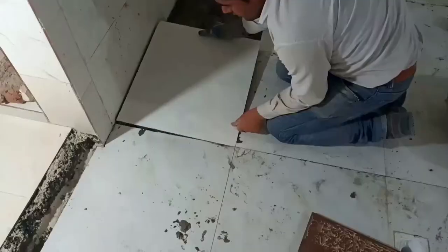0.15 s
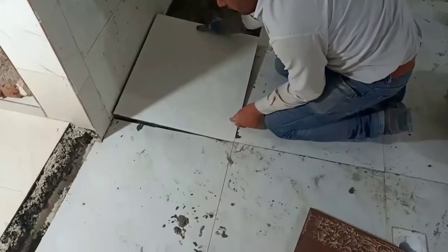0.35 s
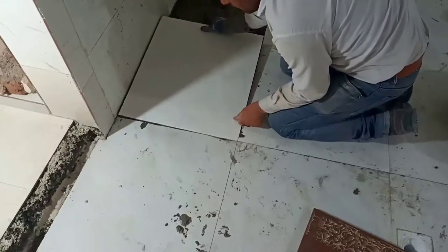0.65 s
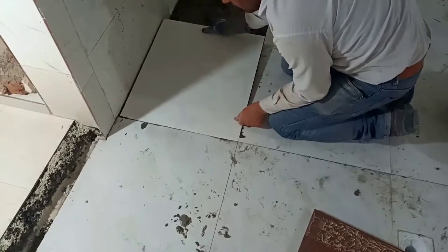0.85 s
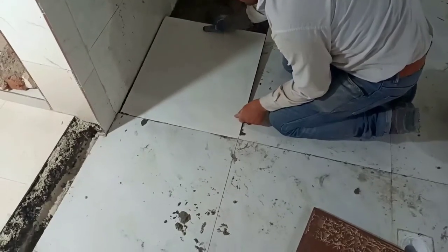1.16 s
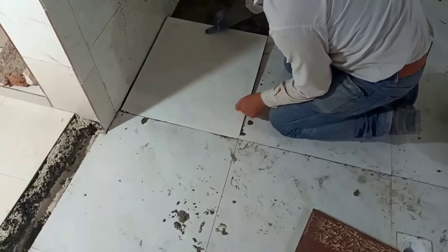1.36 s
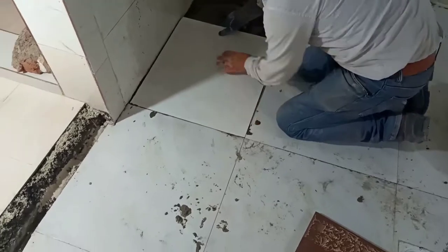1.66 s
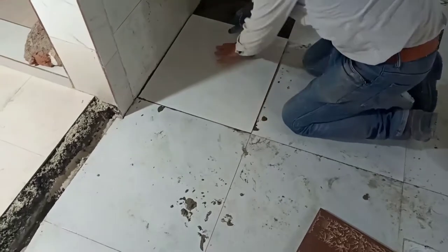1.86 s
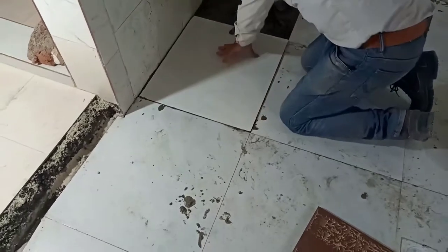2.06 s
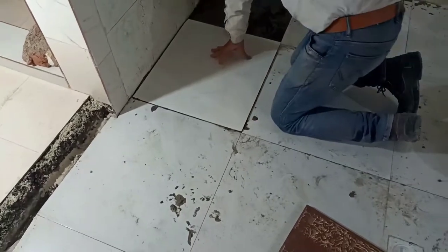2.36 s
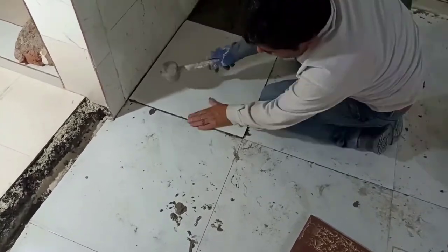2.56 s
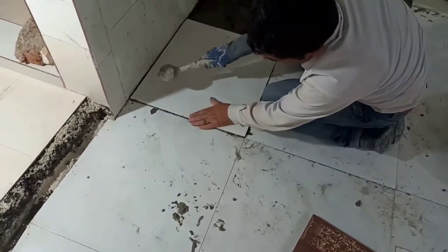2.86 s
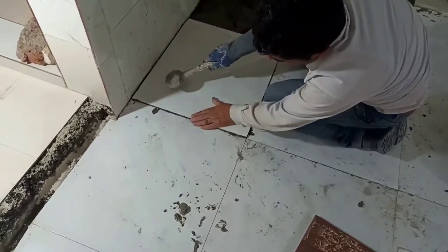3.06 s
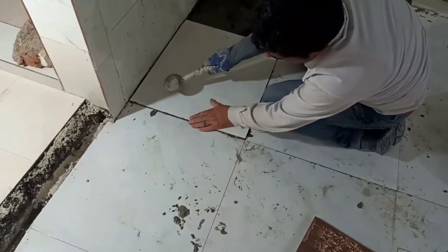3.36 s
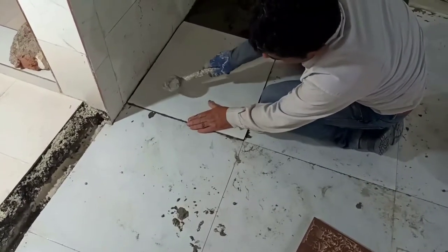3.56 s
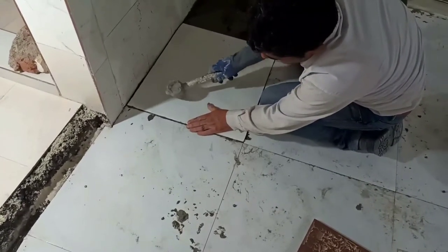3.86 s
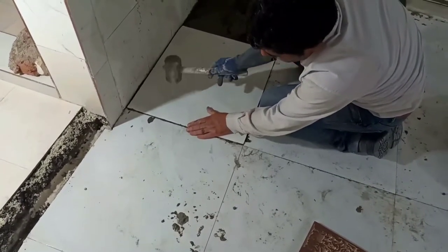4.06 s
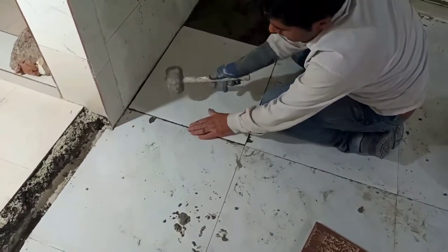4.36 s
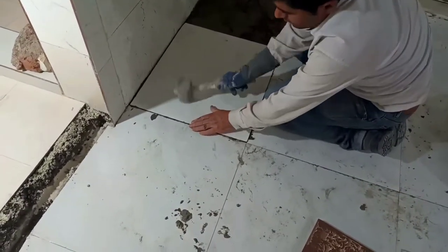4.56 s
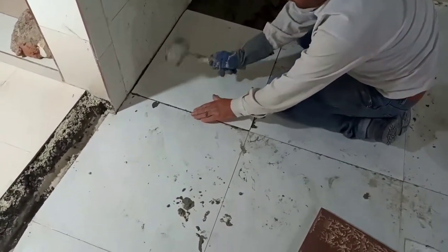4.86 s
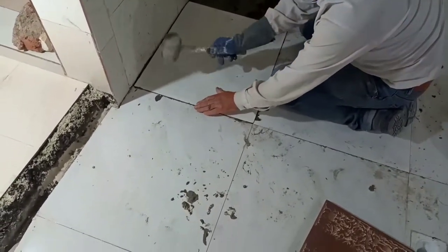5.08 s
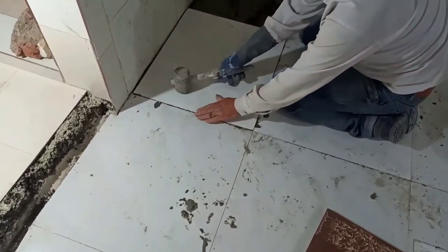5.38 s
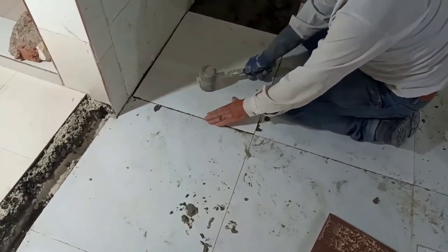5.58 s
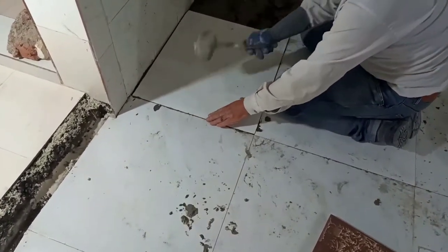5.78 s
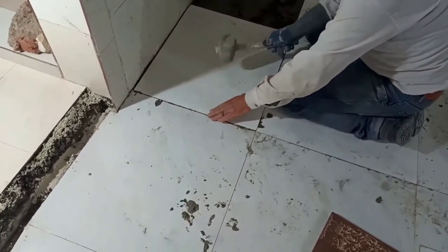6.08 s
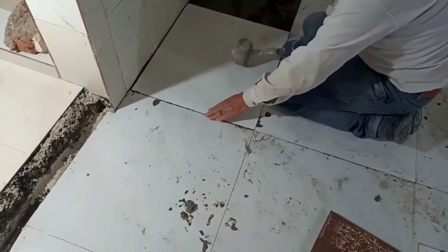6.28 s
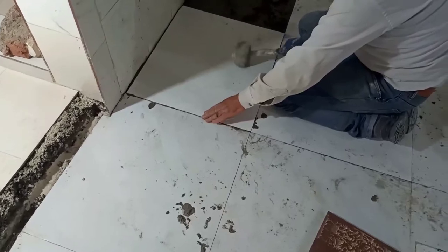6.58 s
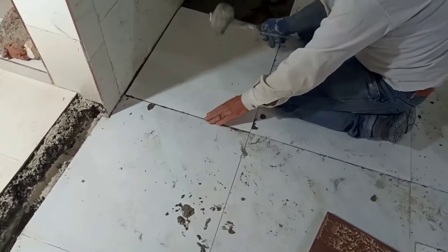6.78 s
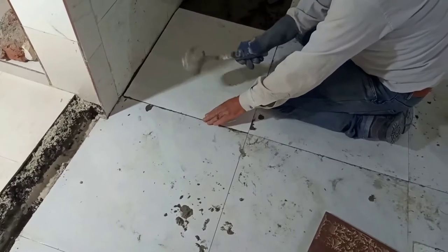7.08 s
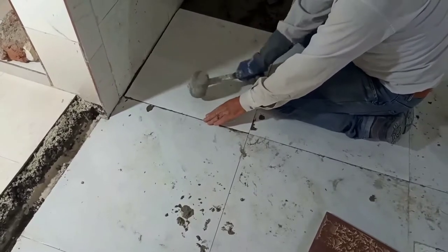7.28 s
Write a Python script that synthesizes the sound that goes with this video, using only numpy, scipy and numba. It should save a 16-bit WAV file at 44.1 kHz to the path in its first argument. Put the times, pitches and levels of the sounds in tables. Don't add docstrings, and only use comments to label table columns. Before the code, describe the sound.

In a bare, echoing bathroom, a fizzy wet squeegee stroke with tiny water ticks ends abruptly. A big ceramic tile then scrapes over grit, rocks and knocks its neighbours. After a short lull, a rubber mallet strikes about three times a second, hollow and cracking at first, then firmer and louder. A faint cricket rasps outside. Close phone pickup squashes the blows and lifts the long reverberation.

```python
import sys
import numpy as np
from scipy import signal
from scipy.fft import rfft, irfft
from scipy.io import wavfile
from scipy.ndimage import uniform_filter1d
from numba import njit

SR = 44100
rng = np.random.default_rng(int(sys.argv[2]) if len(sys.argv) > 2 else 0)


def gain_from_decibels(decibels):
    exponent = np.asarray(decibels, float) / 20
    return 10 ** exponent


def wrap_up_sound(samples):
    columns = np.atleast_2d(samples).T
    tamed = np.clip(columns, -1, 1)
    steps = np.round(tamed * 32767).astype(np.int16)
    wavfile.write(sys.argv[1], SR, steps)


N = 327663
T = np.arange(N) / SR
HZ = np.maximum(np.arange(N // 2 + 1) * SR / N, 1)

CUT_TIMES = (.1595, .162, .2015, .203, .213, .217)
BAND_EDGES = KEP_EDGES = (550, 2400, 8620)
# (time [s], peak [dB], tile note [Hz], slap [dB], crack [dB])
HOLLOW_BLOWS = [
    (2.8544, -17.5, 172, -39, -37),
    (3.1634, -15, 170, -43.5, -32),
    (3.4574, -15, 165, -44, -34),
    (3.7368, -15, 169, -46, -42),
    (4.0238, -12.5, 166, -46, -56),
]
# (time [s], peak [dB], tile note [Hz], slap [dB], crack [dB])
FIRM_BLOWS = [
    (4.355, -11, 174, -41, -48),
    (4.7158, -10.5, 206, -45.5, -54),
    (5.0499, -10.5, 212, -45, -42),
    (5.3479, -10, 232, -48, -36),
    (5.6296, -22, 230, -54.5, -66),
    (6.0974, -13.5, 188, -35.5, -32),
    (6.4056, -12, 213, -28, -30),
    (6.6835, -13, 195, -35, -40),
    (7.0913, -12.5, 198, -40, -34.5),
    (7.403, -12.5, 210, -26, -28.5),
]


def unit(x):
    return x / np.sqrt(np.mean(x ** 2))


def curves(table):
    s, *columns = np.transpose(table)
    return [np.interp(T, s, c) for c in columns]


def step(hz, sharp):
    return 1 / (1 + np.exp(np.clip(-sharp * np.log(HZ / hz), -50, 50)))


def shape(x, gain):
    return irfft(rfft(x) * gain, N)


def colour(points):
    hz, db = np.transpose(points)
    return gain_from_decibels(np.interp(np.log(HZ), np.log(hz), db))


def split(x, edges, sharp):
    above = [1] + [step(e, sharp) for e in edges] + [0]
    return [unit(shape(x, np.sqrt(np.maximum(a - b, 0)))) for a, b in zip(above, above[1:])]


@njit
def svf(x, hz, width):
    y, b, l = np.empty(len(x)), 0., 0.
    for i in range(len(x)):
        g, k = np.tan(np.pi * hz[i] / SR), width / hz[i]
        v = (b + g * (x[i] - l)) / (1 + g * (g + k))
        b, l, y[i] = 2 * v - b, l + 2 * g * v, k * v
    return y


def noise_band(noise, hz, first_width, second_width):
    centre = np.full(len(noise), float(hz))
    return svf(svf(noise, centre, first_width), centre, second_width)


def grit(spread_db, smear_s):
    power = gain_from_decibels(spread_db * np.minimum(rng.exponential(size=N), 7)) ** 2
    keep = np.exp(-1 / (smear_s * SR))
    swell = np.sqrt(signal.lfilter([1 - keep], [1, -keep], power))
    return unit(swell * rng.standard_normal(N))


def add(out, s, x):
    i = int(s * SR)
    out[i:i + len(x)] += x[:N - i]


def fade(t, t60):
    return np.exp(-np.log(1000) * t / t60)


def tails(starts, levels, falls, sudden, share, start_db, start_s, blend_s):
    k = np.maximum(np.searchsorted(starts, T, "right") - 1, 0)
    age = np.maximum(T - np.array(starts)[k], 0)
    db = np.array(levels).T[:, k] - np.outer(share, falls[k] * age)
    db = db + np.outer(start_db, sudden[k] * np.exp(-age / start_s))
    return uniform_filter1d(db, int(blend_s * SR), axis=1)


def played(source, colours, rings, changes, levels, ripple_db):
    out = 0
    for points, peaks, a, b in zip(colours, rings, (0,) + changes, changes + (N / SR,)):
        ring = 1 + sum(gain_from_decibels(db) / (1 + 2j * (HZ - hz) / w) for hz, w, db in peaks)
        comb = np.clip(rng.standard_normal(800), -3, 1.6)
        ripple = gain_from_decibels(ripple_db * np.interp(HZ / 30, np.arange(800), comb))
        bands = split(shape(source, colour(points) * ring * ripple), BAND_EDGES, 3.39)
        stage = np.interp(T, (a - .003, a + .003, b - .003, b + .003), (0, 1, 1, 0))
        out = out + sum(x * gain_from_decibels(db) for x, db in zip(bands, levels)) * stage
    return out


def room_floor():
    # (frequency [Hz], level [dB per Hz])
    floor_colour = [(12, -42.5), (20, -8), (202, 9), (238, 14), (382, -3), (2400, -13.5), (4430, -38),
                    (5530, -56), (6720, -44), (15500, -51)]
    return gain_from_decibels(-57) * unit(shape(rng.standard_normal(N), colour(floor_colour)))


def cricket():
    # (first chirp [s], last [s])
    phrases = [
        (2.67, 3.8),
        (5.0, 7.43),
    ]
    # (time [s], level [dB])
    lift = [(2.7, -90), (2.95, -81), (3.3, -84), (3.6, -82), (5.2, -86), (5.45, -79), (5.7, -79),
            (5.85, -83), (6.0, -91), (6.15, -77), (6.55, -74), (6.75, -81), (6.95, -80), (7.2, -77)]
    # (frequency [Hz], level [dB per Hz])
    rasp_colour = [(9700, -38), (10100, 0), (11500, 2), (11700, -2), (12300, -6), (12700, -40)]
    chirp_s, sounding = .125, .78
    chirps = 0
    for a, b in phrases:
        phase = (T - a) / chirp_s % 1
        swell = 0.28 + 0.55 * phase / sounding
        chirps = chirps + swell * (phase < sounding) * (T > a - .03) * (T < b)
    rasp = unit(shape(rng.standard_normal(N), colour(rasp_colour)))
    chirps = uniform_filter1d(np.roll(chirps, SR // 50), SR // 100)
    return chirps * gain_from_decibels(curves(lift)[0]) * rasp


def standing_waves(age, far):
    # (frequency [Hz], level [dB])
    far_push = [(131.8, -44.1), (135.0, -48.2), (189.8, -39.9), (204.8, -44.2), (281.8, -47.8)]
    far_pull = [(152, -45), (157.2, -39), (161.5, -46), (167.2, -46.5), (174, -43.5), (211.2, -46),
                (236.8, -41.5), (244.5, -46), (261.5, -49.5)]
    near_push = [(152.8, -43.5), (157.2, -41), (185, -46), (193.8, -42), (198.5, -42), (211.2, -45),
                 (283.2, -44.5), (426.2, -45)]
    near_pull = [(189.8, -40.5), (217.5, -44.5), (227.2, -39), (246.2, -44.5), (344, -42.5), (398.2, -45.5)]

    def waves(modes, t):
        return sum(gain_from_decibels(db) * np.sin(2 * np.pi * hz * t) for hz, db in modes)

    t = T[:SR]
    late = t - .003
    from_near = unit(waves(near_push, t) - waves(near_pull, t))
    from_far = unit(waves(far_push, late) - waves(far_pull, late))
    i = np.minimum((age * SR).astype(int), SR - 1)
    return np.where(far, from_far[i], from_near[i]) * np.clip((age - .014) / .008, 0, 1)


def echo():
    # (boom [dB], body [dB], hiss [dB], air [dB], fall [dB/s])
    let_through = [(-34.5, -50.5, -48, -55, 28.5), (-32, -37.5, -53, -56, 35.5),
                   (-32, -40.5, -51.5, -57, 36), (-31.5, -38, -52.5, -59, 37.5),
                   (-35, -51, -64.5, -94, 30.5), (-28.5, -56.5, -53.5, -102, 36.5),
                   (-34.5, -47, -68.5, -102, 3), (-31.5, -49, -62.5, -79, 1.5), (-32.5, -44, -59, -67, -7),
                   (-28, -36.5, -74, -61, 35.5), (-30.5, -53, -55.5, -58.5, -1),
                   (-30.5, -42.5, -53.5, -57.5, -9), (-30, -50.5, -56, -68, 0),
                   (-34, -46.5, -68, -59.5, -14.5), (-31, -50, -74, -49, 10)]
    # (frequency [Hz], level [dB per Hz])
    echo_colours = [
        [(18, -79), (30, -45), (85, 4), (164, -2), (243, -1), (420, -21), (728, -24), (1820, -27), (3070, -34),
         (7460, -40), (15500, -79)],
        [(30, -55), (95, 3), (164, 2), (243, -5), (399, -20), (921, -25.5), (1200, -28), (4090, -35.5),
         (5040, -41.5), (6540, -41.5), (15500, -70.5)],
        [(18, -79), (30, -58), (110, -1.5), (225, -4), (410, -15.5), (600, -21), (800, -26.5), (1800, -35.5),
         (2500, -43.5), (6500, -54), (15500, -82)],
        [(18, -70), (30, -48), (69, -21.5), (144, -2.5), (225, -5), (467, -6.5), (561, -13.5), (874, -19),
         (3780, -27.5), (5890, -32), (6540, -34), (9680, -45.5), (15500, -70)],
    ]
    # (frequency [Hz], width [Hz], level [dB])
    loose = [(740, 270, 7), (850, 250, 14), (1400, 100, 3), (2080, 100, 10), (3050, 180, 15),
             (3300, 120, 3), (4530, 200, -6)]
    settling = [(950, 27, -2), (1490, 28, 5.5), (1879, 170, -8)]
    room_modes = [(200, 5.5, -11), (237.5, 19, 4.5), (283, 31, 2.5), (346.7, 5.9, 3.5), (400, 10, -2),
                  (493, 9.5, -21)]
    bedded_modes = [(154, 21, -6.5), (195, 5.5, 1), (231, 14, 6.5), (276, 16, -0.5), (337, 10.5, -0.5),
                    (405, 11, -7), (483, 23, -4), (960, 60, -2.5), (4060, 430, -6), (6730, 100, -5)]
    bedding = (3.163, 4.355, 5.05, 6.097)
    standing_share = (.8, .85, .85, .8, .8, .3, .55, .5, .25, .05, .55, .5, .25, .55, .45)
    # share of the fall, and early reflections on top [dB]
    echo_fall = (0.89, 0.74, 1.02, 1.3)
    early_db = (-5, 19, -4, 12.5)
    gate_slope = (2.8, 2.8, 3.4, 4.5)
    gate_db, air_fall_db_s = -40, 44

    blows = HOLLOW_BLOWS + FIRM_BLOWS
    starts = np.array([b[0] for b in blows])
    live = np.interp(T, (starts[0], starts[0] + 0.0059), (0, 1))
    for s in starts:
        add(live, s, -.75 * live[int(s * SR)] * np.exp(-(T[:SR // 20] / 0.0077) ** 2))
    live = uniform_filter1d(uniform_filter1d(live, SR // 500), SR // 500)

    rows = np.array(let_through)
    sudden = np.interp([b[3] for b in blows], (-57.5, -42.5), (0, 1))
    levels = tails(starts, rows[:, :-1], rows[:, -1], sudden, echo_fall, early_db, 0.02, 0.0055)
    levels = levels - np.outer(gate_slope, np.maximum(gate_db - levels[0], 0))
    k = np.maximum(np.searchsorted(starts, T, "right") - 1, 0)
    age = np.maximum(T - starts[k], 0)
    levels[3] -= air_fall_db_s * age

    share = np.array(standing_share)[k]
    modes = np.sqrt(share) * gain_from_decibels(levels[0] + 1.1) * standing_waves(age, k < len(HOLLOW_BLOWS))
    rings = (loose, settling, room_modes, room_modes, bedded_modes)
    colours = echo_colours + echo_colours[-1:]
    wash = live * played(rng.standard_normal(N), colours, rings, bedding, levels, 1.6)
    boom = shape(wash, 1 - step(320, 8.))
    yielded = (1 - np.sqrt(1 - uniform_filter1d(share, SR // 200))) * boom
    return wash - yielded + uniform_filter1d(modes, SR // 2000)


def squeegee():
    # (time [s], level [dB])
    pressure = [
        (0.0, -49),
        (0.115, -50.5),
        (0.132, -46.5),
        (0.145, -47),
        (0.16, -46.5),
    ]
    # (frequency [Hz], level [dB per Hz])
    swish_colour = [(24, -68), (40, -36), (213, -31), (241, -3), (280, -5), (548, -7), (1410, -16),
                    (1770, -7.5), (5440, -2), (6640, -4.5), (15500, -25)]
    wet = shape(grit(3.7, 0.0012), colour(swish_colour))
    rush, hiss = split(wet, (1500,), 19.0)
    return (gain_from_decibels(-5) * rush + hiss) * gain_from_decibels(curves(pressure)[0]) * (T < CUT_TIMES[2] - .02)


def snaps(events, t60, width):
    out, t = np.zeros(N), T[:SR // 30]
    for s, db, hz in events:
        snap = unit(noise_band(rng.standard_normal(len(t)), hz, width * hz, width * hz))
        add(out, s, gain_from_decibels(db) * fade(t, t60) * (1 - np.exp(-t / 0.00034)) * snap)
    return out


def water_drops():
    # (time [s], peak [dB], pitch [Hz])
    flicked = [(0.0178, -42, 6700), (0.031, -36.5, 3300), (0.0625, -43, 6600), (0.0625, -45, 600),
               (0.071, -48, 13000), (0.0625, -53, 13500), (0.0955, -40, 6900), (0.0975, -37, 6700),
               (0.1285, -29.5, 2580)]
    return snaps(flicked, 0.0086, 0.64)


def bites():
    # (time [s], peak [dB], pitch [Hz])
    crushed = [(0.6505, -30, 2930), (0.6577, -34, 1640), (0.6946, -28, 2310), (0.7231, -35, 2310),
               (0.7365, -37, 3550), (0.9011, -30, 4060), (0.9095, -22, 1450), (0.9095, -24.5, 3300),
               (0.962, -42, 6500), (1.5452, -29, 4200), (1.6415, -30.5, 1890), (1.7348, -29, 3740),
               (1.9582, -34, 4210), (2.068, -33, 4200), (6.6837, -41, 5000), (0.652, -36, 4500),
               (3.748, -32, 3900)]
    return snaps(crushed, 0.023, 0.55)


def slide():
    # (frequency [Hz], level [dB per Hz])
    grip_colours = [
        [(18, -70), (30, -30), (130, 20), (400, -2.5), (874, -6.5), (1290, -12.5), (2400, -25), (6540, -34.5),
         (15500, -58.5)],
        [(18, -80), (30, -64), (125, -6), (180, -19.5), (300, -3), (770, -12), (2000, -15.5), (6540, -21),
         (15500, -46)],
        [(18, -72), (30, -39), (95, 4), (152, 5), (208, -1.5), (341, -4), (1020, -9), (4190, -28.5),
         (5740, -31.5), (6370, -32.5), (15500, -54)],
        [(18, -53), (30, -21), (202, -5), (575, -20.5), (5590, -27), (6720, -28), (15500, -45.5)],
    ]
    nudged_colour = [(18, -80), (30, -73), (95, -12), (180, -16), (300, -13), (470, -12), (800, -9),
                     (2000, -9.5), (6540, -19), (15500, -42)]
    dropped_colour = [(18, -72), (30, -39), (90, 6), (208, 0), (341, -10), (1020, -3), (4190, -34.5),
                      (5740, -31), (15500, -55.5)]
    # (frequency [Hz], width [Hz], level [dB])
    lifted = [(684, 12, 16), (930, 140, 7), (1186, 25, 4), (1450, 60, 0), (1780, 81, 7), (2190, 65, 4),
              (3115, 51, 8.5), (4200, 43, 3), (6380, 40, 3), (7560, 46, 3), (11800, 150, -1)]
    lowered = [(233, 8.9, 7), (677, 53, -10), (960, 97, 5.5), (1070, 62, 9.5), (1474, 97, 8), (1965, 21, 7),
               (2300, 19, 7), (3910, 57, 2), (4130, 32, 5), (4560, 32, -1)]
    nudged = [(222.2, 5.3, 11.5), (346, 20, 2), (664, 25, 6), (930, 80, -2), (1090, 49, 7.5),
              (1420, 80, 6.5), (1796, 49, 7.4), (2310, 30, 3), (3740, 93, 5), (4200, 25, -3),
              (6370, 64, -3)]
    dropped = [(364, 64, 16), (1000, 93, -15), (670, 34, 6), (3740, 80, 9), (4200, 120, 13.5),
               (6500, 110, -2)]
    lying = [(314, 110, -1), (1410, 38, 0), (1730, 73, -6), (2370, 75, -3), (3020, 42, -5), (3400, 170, -4),
             (3740, 54, 7), (4200, 150, 2.5), (6600, 41, -3), (6470, 150, -4), (7530, 63, 1)]
    grip_changes = (0.651, 0.902, 1.45, 1.7, 2.58)
    # (time [s], pitch [Hz], level [dB])
    song = [(0.225, 437, -53), (0.25, 431, -46), (0.272, 451, -52), (0.29, 433, -39), (0.324, 439, -35),
            (0.364, 425, -50), (0.392, 433, -38.5), (0.602, 450, -44.5), (0.645, 452, -63)]
    # (time [s], rumble [dB], body [dB], grit [dB], fall [dB/s], negative while the push builds up)
    pushes = [(0.2, -80, -60, -52, -190), (0.288, -65, -42, -39, 7), (0.652, -34, -28.5, -59, 76),
              (0.716, -40, -38, -48, -300), (0.731, -36, -32, -44, 55), (0.817, -37.5, -34.5, -50.5, 18),
              (0.886, -44, -39, -46, -300), (0.905, -31.5, -39.5, -44.5, 50), (1.19, -40, -60, -58, 29),
              (1.3, -40, -61, -54.5, 40), (1.45, -56, -52, -53, -101), (1.543, -49, -36, -36, 36),
              (1.635, -52, -37, -44, 8), (1.729, -45, -32.5, -43.5, -16), (1.82, -52, -32, -43, 28),
              (1.958, -50, -32, -39, 36), (2.075, -46, -37, -44, 40), (2.33, -50.5, -50.5, -58, 26),
              (2.505, -52, -48.5, -57, 80), (2.582, -52.5, -69, -74.5, -0.5)]
    # share of the fall, and the scrape at a push's start [dB]
    push_fall = (0.58, 1.2, 1, 1.7)
    push_start_db = (2, 1, 4.8, 2.7)

    live = (T > CUT_TIMES[2] - .02) * np.interp(T, (2.85, 2.87), (1, 0))
    hz, db = curves(song)
    singing = (T > song[0][0]) & (T < song[-1][0])
    hum = np.sqrt(2) * gain_from_decibels(db) * np.sin(2 * np.pi * np.cumsum(hz) / SR) * singing

    up, down, flat, still = grip_colours
    colours = up, down, nudged_colour, dropped_colour, flat, still
    rings = lifted, lowered, nudged, dropped, lying, []
    s, rumble, body, grains, fall = np.transpose(pushes)
    air = grains + 0.47 * (body - grains) - 26.5
    bands = np.transpose([rumble, body, grains, air])
    levels = tails(s, bands, fall, fall > 0, push_fall, push_start_db, 0.036, 0.0037)
    return hum + live * played(grit(4.2, 0.0062), colours, rings, grip_changes, levels, 3.0)


def rocks():
    # (time [s], peak [dB], pitch [Hz], swell [s])
    rocking = [(0.655, -41, 342, 0.0085), (0.725, -27.5, 245, 0.011), (0.82, -28, 237, 0.0079),
               (0.899, -38, 136, 0.0088), (1.485, -39, 346, 0.023), (1.52, -30.5, 1000, 0.032),
               (1.64, -30, 375, 0.014), (1.744, -33, 147, 0.024), (1.76, -41, 350, 0.015),
               (1.955, -33.5, 160, 0.0068), (1.975, -31, 1010, 0.006), (2.865, -28.5, 894, 0.0036),
               (3.165, -37, 3830, 0.003), (3.17, -31, 1450, 0.0027), (3.181, -39, 3220, 0.0026),
               (3.19, -29.5, 930, 0.0052), (4.025, -42, 81.5, 0.026), (4.13, -40, 72.5, 0.032),
               (3.74, -36, 1484, 0.012), (4.716, -39, 428, 0.0036), (5.052, -24.5, 414, 0.0055),
               (0.86, -36.5, 224.6, 0.05), (0.98, -37, 224, 0.045), (0.655, -27, 669.8, 0.024),
               (1.555, -37, 364, 0.027), (2.857, -48, 3080, 0.0063), (6.72, -30, 200, 0.011),
               (0.28, -37, 960, 0.015), (0.3, -34, 859, 0.028), (0.656, -41, 1060, 0.008),
               (0.66, -37.5, 2290, 0.02), (0.659, -30, 1640, 0.008), (0.735, -33, 925, 0.022),
               (0.73, -28.5, 597, 0.0099), (1.07, -38, 1830, 0.01), (1.79, -31, 804, 0.012),
               (1.8, -39, 1410, 0.012)]
    out, t = np.zeros(N), T[:SR // 6]
    for s, db, hz, swell_s in rocking:
        swell = t / swell_s * np.exp(1 - t / swell_s)
        add(out, s, gain_from_decibels(db) * swell * np.sin(2 * np.pi * hz * t))
    return out


def knocks():
    # (time [s], peak [dB], pitch [Hz], t60 [s])
    edge_knocks = [(0.654, -27, 690, 0.13), (0.732, -20, 705, 0.11), (0.906, -14.5, 1416, 0.084),
                   (1.278, -19.5, 1040, 0.046), (1.311, -24, 636, 0.05), (1.545, -27, 1000, 0.084),
                   (1.641, -33, 1050, 0.066), (1.959, -21, 1044, 0.28), (2.504, -30, 850, 0.032)]
    # (time [s], peak [dB], pitch [Hz])
    ticks = [(1.5701, -28, 4190), (1.9792, -20, 3600), (1.1804, -34, 2340), (1.263, -36.5, 4180),
             (1.303, -34, 3740), (1.3827, -32, 3740), (2.1455, -30.5, 3730), (2.506, -34.5, 3650),
             (6.4065, -48, 6470), (1.54, -25, 4150), (6.683, -24.5, 3760)]
    # (time [s], peak [dB], pitch [Hz])
    chinks = [(1.55, -31, 4030), (1.572, -38, 4200), (2.8575, -23.5, 3210), (2.8581, -33, 5310),
              (2.868, -32, 3170), (2.8816, -38, 3050), (3.175, -32, 1490), (4.716, -30, 1270),
              (4.7153, -47, 2140), (4.7157, -49, 2470), (3.009, -44, 2080)]
    out, t = np.zeros(N), T[:SR // 8]
    for s, db, hz, t60 in edge_knocks:
        crunch = signal.lfilter([.6], [1, -.6], rng.standard_normal(len(t)))
        ring = np.sin(2 * np.pi * hz * t)
        add(out, s, gain_from_decibels(db - 8.5) * fade(t, t60) * (ring + 0.079 * crunch))
    for s, db, hz in ticks:
        snap = noise_band(rng.standard_normal(len(t)), hz, 5000., 5000.)
        add(out, s, gain_from_decibels(db - 2.0) * fade(t, 0.029) * snap)
    for s, db, hz in chinks:
        swell = (t / .0016) ** 2 * np.exp(2 - 2 * t / .0016)
        add(out, s, gain_from_decibels(db) * swell * np.sin(2 * np.pi * hz * t))
    return out


def thumps():
    # (time [s], level [dB])
    floor_shakes = [(4.0225, -59), (4.3548, -37), (4.7158, -32), (5.0488, -38), (5.3481, -51),
                    (6.0975, -39), (6.4063, -55), (7.0919, -51), (7.4027, -37)]
    out, t = np.zeros(N), T[:SR // 5]
    for s, db in floor_shakes:
        add(out, s, gain_from_decibels(db) * np.sin(2 * np.pi * 36 * t) * fade(t, 0.1))
    return out


def mallet(blows, walls, rise_s, press_s, t60, hold_s, slap_t60, crack_lag_s, crack_s, crack_hz):
    out, t = np.zeros(N), T[:SR // 5]
    for s, db, hz, slap_db, crack_db in blows:
        chance = rng.standard_normal((2, len(t)))
        turns = hz * t + 0.39 * (1 - np.exp(-t / press_s))
        duck = 1 / (1 + np.exp(np.minimum((t - hold_s) / 0.0029, 50)))
        rise = 1 - np.exp(-t / rise_s)
        note = -gain_from_decibels(db) * rise * np.sin(2 * np.pi * turns) * fade(t, t60) * duck
        slap = unit(noise_band(chance[0], 1200., 1800., 1800.))
        add(out, s + 0.00043, gain_from_decibels(slap_db) * slap * rise * fade(t, slap_t60) * duck)
        crack = unit(noise_band(chance[1], crack_hz, 7000., 4500.))
        swell = (t / crack_s) * np.exp(1 - t / crack_s)
        for k, (lag, crack_wall_db, note_wall_db) in enumerate(walls):
            burst = np.roll(crack, 997 * k) * swell
            add(out, s + crack_lag_s + lag, gain_from_decibels(crack_db + crack_wall_db) * burst)
            add(out, s + lag, gain_from_decibels(note_wall_db) * note)
    return out


def bedding_blows():
    # (delay [s], crack [dB], note [dB])
    far_walls = [(0, -4, -1), (.0062, -3, -27), (0.0126, -1.5, -39), (0.016, -10, -33), (.022, -8, -13)]
    near_walls = [(0, 0, 2.5), (.0062, -1.5, -8.5), (0.0115, -2, -2)]
    corner_walls = [(0, -0.5, 1.5), (.0057, -2.5, -6), (0.0119, -2, -3), (0.017, -14, -14)]
    hollow = mallet(HOLLOW_BLOWS[:4], far_walls, rise_s=0.0022, press_s=0.0014, t60=0.37, hold_s=0.014,
                    slap_t60=0.57, crack_lag_s=0.0013, crack_s=0.00085, crack_hz=3800.0)
    deep = mallet(HOLLOW_BLOWS[4:], far_walls[:1], rise_s=0.0021, press_s=0.0029, t60=0.053, hold_s=0.011,
                  slap_t60=0.1, crack_lag_s=0.003, crack_s=0.0007, crack_hz=4100.0)
    firm = mallet(FIRM_BLOWS[:5], near_walls, rise_s=0.00087, press_s=0.002, t60=0.022, hold_s=0.028,
                  slap_t60=0.032, crack_lag_s=0.0015, crack_s=0.00054, crack_hz=4100.0)
    corner = mallet(FIRM_BLOWS[5:], corner_walls, rise_s=0.00056, press_s=0.0015, t60=0.025, hold_s=0.028,
                    slap_t60=0.036, crack_lag_s=0.00028, crack_s=0.0004, crack_hz=4940.0)
    return hollow + deep + firm + corner


def scene():
    background = room_floor() + cricket() + echo()
    wiping = squeegee() + water_drops()
    sliding = slide() + bites() + rocks()
    dull = gain_from_decibels(-13 * step(BAND_EDGES[2] * 1.25, 6.2))
    hits = shape(knocks() + thumps() + bedding_blows(), dull)
    return (background + wiping + sliding + hits)[None]


def top_cut(x):
    return signal.sosfilt(signal.butter(12, 15760, fs=SR, output="sos"), x)


def record(dry):
    # (frequency [Hz], step [dB])
    ledges = [(4800, -7.5), (6150, 5), (7700, -4.5), (8620, -15)]
    treble_db = sum(db * (step(hz, 220.0) - step(hz, 3.7)) for hz, db in ledges) + 7.8 * step(11300, 26.0)
    x = shape(dry[0], gain_from_decibels(treble_db)) + gain_from_decibels(-91) * rng.standard_normal(N)
    x = shape(x, 1 - step(15500, 400.))
    cut = np.interp(T, CUT_TIMES, (1, 0, 0, .45, 0.72, 0.94))
    return top_cut(cut * np.tanh(2.71 * x)[None] / 3.36)


dry = scene()
out = record(dry)
wrap_up_sound(out)
```